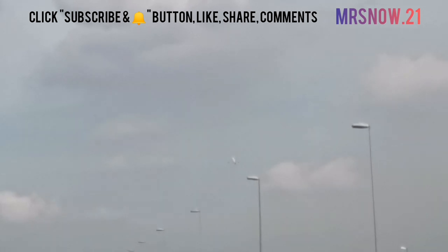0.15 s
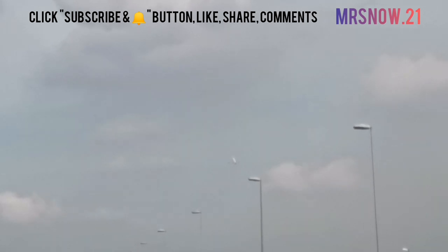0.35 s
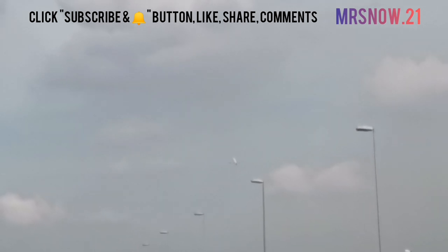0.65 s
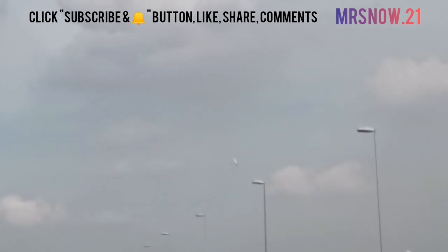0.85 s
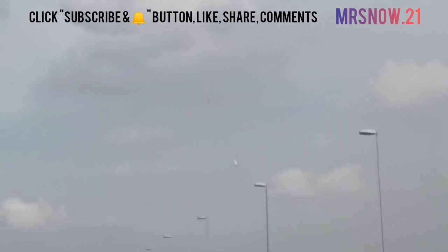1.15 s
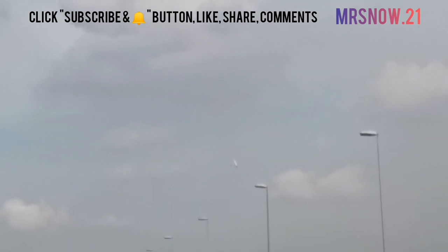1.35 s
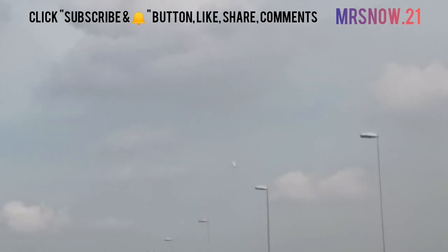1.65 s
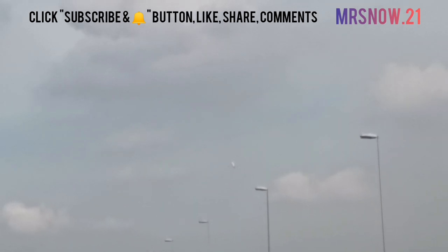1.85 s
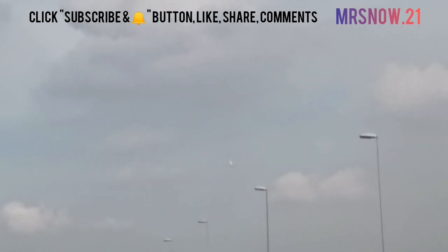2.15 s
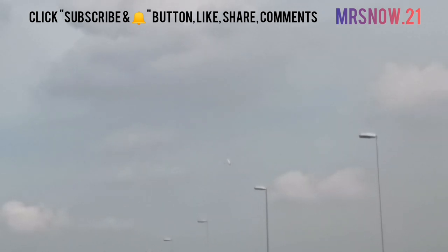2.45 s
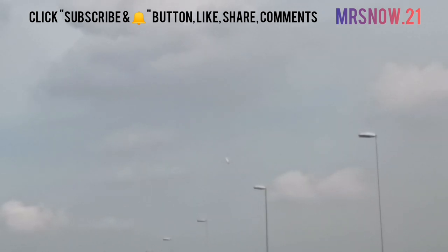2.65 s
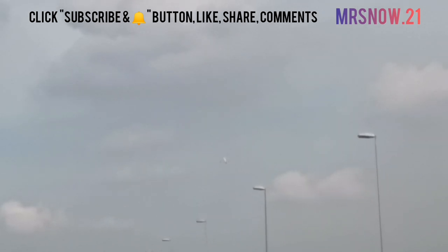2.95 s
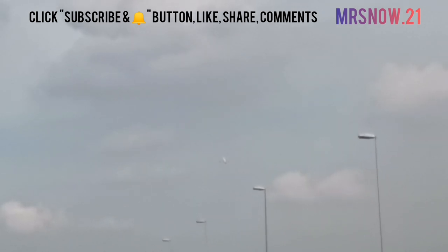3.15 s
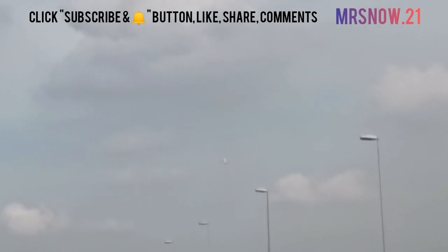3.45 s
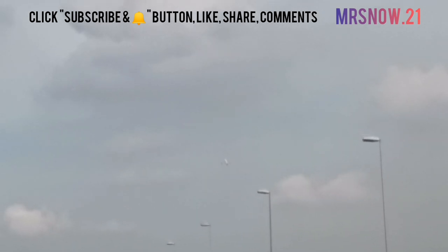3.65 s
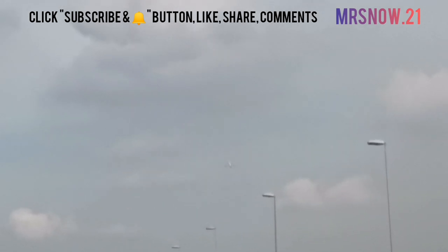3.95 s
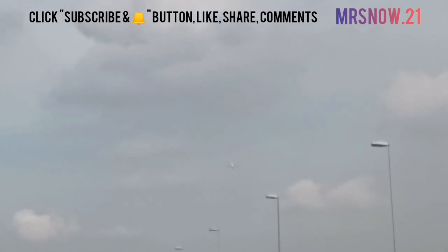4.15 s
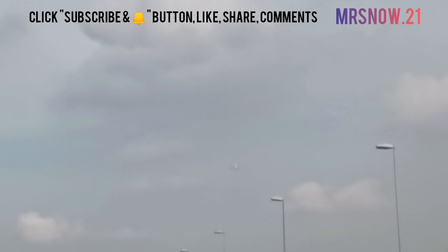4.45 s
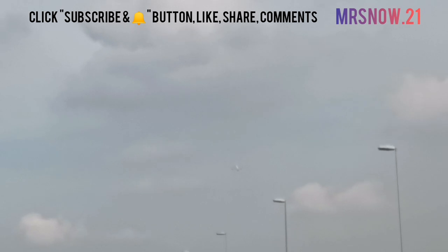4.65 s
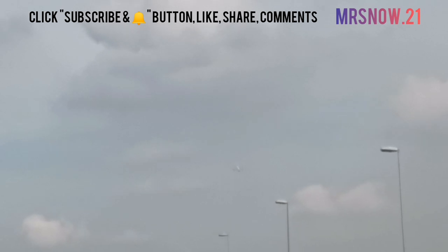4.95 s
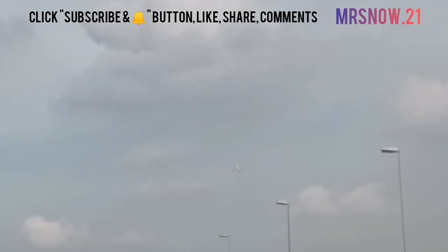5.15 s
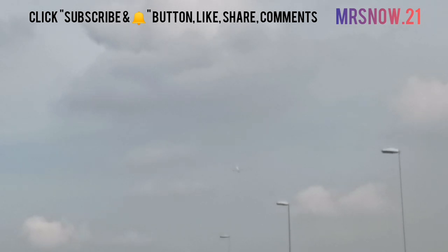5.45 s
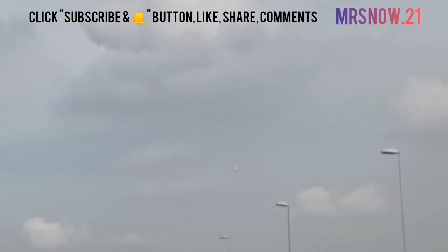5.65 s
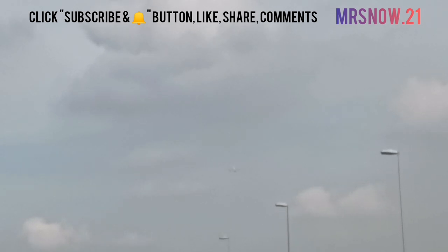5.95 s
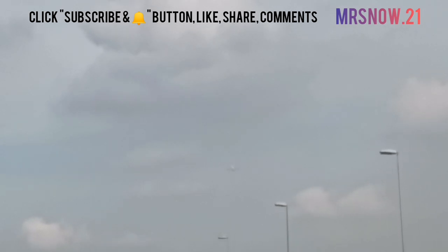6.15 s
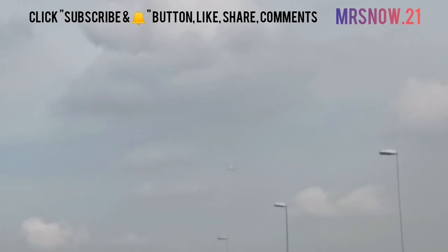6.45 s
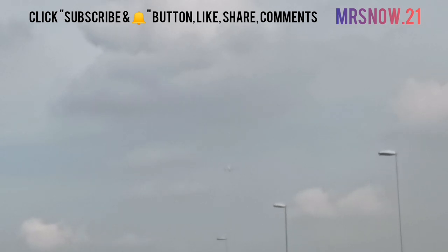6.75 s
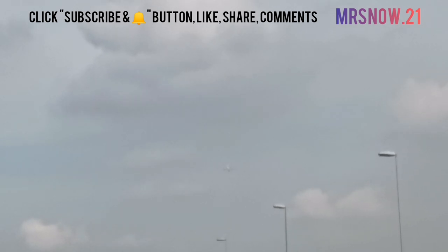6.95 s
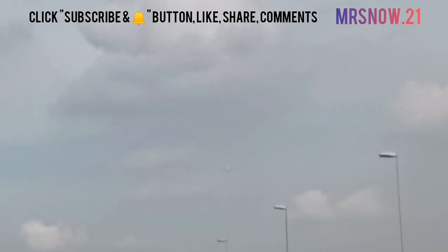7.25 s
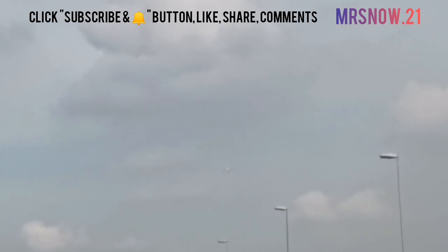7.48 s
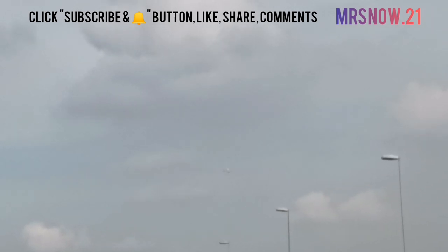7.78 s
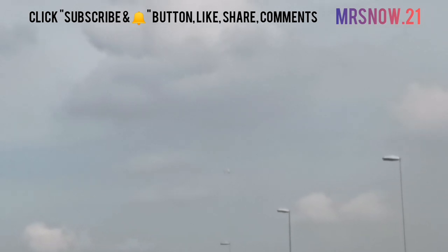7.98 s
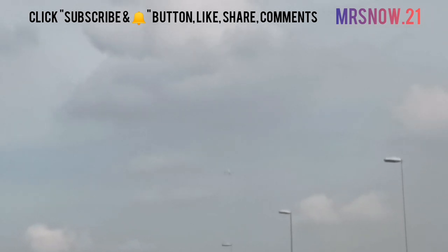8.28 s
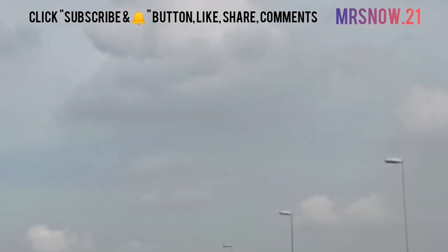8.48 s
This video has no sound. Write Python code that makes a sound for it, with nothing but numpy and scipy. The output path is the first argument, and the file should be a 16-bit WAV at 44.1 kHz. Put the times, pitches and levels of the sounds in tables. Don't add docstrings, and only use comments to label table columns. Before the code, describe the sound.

Outdoors near walls and leaves, a far airliner gives a deep, unsteady rumble that brightens around the middle, then fades. Two small birds repeat quick two-note whistles about twice a second, with short echoes. One pauses, a single dull tick lands on the right, then it resumes. Other birds chip and coo; town hum and high insect hiss stay beneath. Small stereo recorder.

```python
import sys
import numpy as np
from scipy import signal
from scipy.fft import rfft, irfft, next_fast_len
from scipy.io import wavfile
from scipy.ndimage import uniform_filter1d

SR = 44100
rng = np.random.default_rng(int(sys.argv[2]) if len(sys.argv) > 2 else 0)


def inscribe(sig):
    pcm = np.round(np.clip(np.atleast_2d(sig).T, -1, 1) * 32767)
    wavfile.write(sys.argv[1], SR, pcm.astype(np.int16))


def volts_from_db(level):
    exponent = np.asarray(level, float) / 20
    return 10 ** exponent


N = 380141


def at_hz(points, hz):
    f_hz, values = np.transpose(points)
    return np.interp(np.log(hz), np.log(f_hz), values)


def in_time(rows):
    s, *columns = np.transpose(rows)
    return [np.interp(np.arange(N) / SR, s, c) for c in columns]


# f/Hz, likeness
PORT_LIKENESS = [(60, 1), (200, 1), (380, .98), (700, 0.8), (1200, 0.41), (1900, 0.075), (2600, 0.17),
                 (8000, 0.046)]
# f/Hz, left minus right/dB
PORT_LEAN = [(60, -1), (210, -1.5), (400, -1), (900, -2), (2500, -4), (3700, -8), (4800, -6.5), (6000, -4),
             (7800, 7), (9100, 17.5), (11000, -13), (14000, -0.5)]
# f/Hz, lead/rad
PORT_LEAD = [(900, 0), (1300, 1.6), (2200, 3.8), (16000, 27)]


def stereo_noise(colour, weight=lambda hz: 1):
    size = next_fast_len(N)
    hz = np.maximum(np.arange(size // 2 + 1) * SR / size, 1)
    mid, side = rfft(rng.standard_normal((2, size)))
    alike = np.clip(at_hz(PORT_LIKENESS, hz), -1, 1)
    lead_rad = np.interp(hz, *np.transpose(PORT_LEAD))
    ports = volts_from_db(at_hz(PORT_LEAN, hz) * [[.5], [-.5]]) * np.exp(1j * lead_rad * [[1], [0]])
    pair = ports * (np.sqrt(1 + alike) * mid + np.sqrt(1 - alike) * side * [[1], [-1]])
    out = irfft(pair * volts_from_db(at_hz(colour, hz)) * weight(hz), size)[:, :N]
    return out / out.mean(axis=0).std()


# t/s, level/dB, swell of the middle and upper roar/dB
CLIMB_OUT = [(0, -37, -6.5), (.15, -33.5, -6.5), (.8, -35, -8), (1.4, -37, -2.5), (1.9, -32.5, -6),
             (2.3, -34.5, -0.5), (2.8, -35.5, 1.5), (3.4, -36, 5), (3.8, -34.5, 0.5), (4.3, -36, 4),
             (4.8, -35, 3), (5.2, -33.5, 1), (5.7, -34, 0), (6.2, -35.5, 0), (6.8, -38, -0.5),
             (7.6, -38.5, -2.5), (8.5, -42.5, -1.5), (8.62, -40.5, 0)]
# f/Hz, density/dB
ROAR_SPECTRUM = [(12, -30), (20, -9), (109, 6.5), (168, -1), (233, -2), (262, -5), (349, -15.5), (427, -17),
                 (620, -33.5), (810, -64), (1360, -120)]
ROAR_CENTRES_HZ = [40, 90, 135, 200, 270, 400]
# offset/dB, share of level swing, share of swell
ROAR_SHARES = [
    (-41.5, 0.9, -0.082),
    (-40, 1.23, -.05),
    (-38, 0.48, 0.4),
    (-39.5, 1.1, 1.03),
    (-42.5, 0.8, 1.28),
    (-50.5, 0.42, 0.42),
]


def jet():
    level_db, swell_db = in_time(CLIMB_OUT)
    level_swing_db = level_db - level_db.mean()
    swell_swing_db = swell_db - swell_db.mean()
    out = 0
    for k, (offset_db, by_level, by_swell) in enumerate(ROAR_SHARES):
        share = list(zip(ROAR_CENTRES_HZ, np.eye(len(ROAR_CENTRES_HZ))[k]))
        part_db = offset_db + by_level * level_swing_db + by_swell * swell_swing_db
        out = out + volts_from_db(part_db) * stereo_noise(ROAR_SPECTRUM, lambda hz: np.sqrt(at_hz(share, hz)))
    stop_fade_s = .02
    return out * np.minimum((N - np.arange(N)) / SR / stop_fade_s, 1)


def add_note(track, start_s, shape, level_db, wobble, flutter_db):
    s, hz, db = np.transpose(shape)
    t = np.arange(s[0], s[-1], 1 / SR)
    chance = np.random.default_rng(rng.integers(1 << 30)).standard_normal((2, len(t)))
    shake, flutter = uniform_filter1d(chance, size=225) * 15
    phase = 2 * np.pi * np.cumsum(np.interp(t, s, hz) * (1 + wobble * shake)) / SR
    envelope = volts_from_db(np.interp(t, s, db) + flutter_db * flutter + level_db)
    note = envelope * np.sin(phase) * signal.windows.tukey(len(t), .25)
    at = max(round((start_s + s[0]) * SR), 0)
    track[..., at:at + len(t)] += note[..., :track.shape[-1] - at]


def outdoors(track, paths, turn_db=0, wall=1):
    wall_echo_s, hold_s, t60_s, left_lead_s, onset_s = .036, .07, .26, .00029, .0034
    t, out = np.arange(SR // 2) / SR, []
    for side, (direct_db, echo_db, scatter_db) in enumerate(paths):
        source = np.atleast_2d(track)[-side]
        fade = np.minimum(t / onset_s, 1) * volts_from_db(-60 * np.maximum(t - hold_s, 0) / t60_s)
        clumps = volts_from_db(np.repeat(rng.normal(0, 3, len(t) // 150), 150))
        path = rng.standard_normal(len(t)) * fade * clumps
        path *= volts_from_db(scatter_db) / np.sqrt(np.sum(path ** 2))
        echo = volts_from_db(echo_db) * wall * np.ones(1)
        path[round(wall_echo_s * SR):][:len(echo)] += echo
        lag = round(side * left_lead_s * SR)
        direct = volts_from_db(direct_db) * np.pad(source, (lag, 0))[:N]
        out.append(direct + signal.fftconvolve(source * volts_from_db(turn_db), path)[:N])
    return np.array(out)


def song(cues_s, levels_db, shape, paths, turn_db, wall=1):
    track = np.zeros(N + SR)
    for s, level_db in zip(cues_s, levels_db):
        varied = np.multiply(shape, [1, 1 + .006 * rng.standard_normal(), 1])
        add_note(track, s, varied, level_db + 3, wobble=.004, flutter_db=3)
    return outdoors(track[:N], paths, turn_db, wall)


# t/s, first bird/dB, second bird/dB
HEAD_TURNS = [
    (0, 0, 0),
    (4, 0, 0),
    (4.5, 3, 0),
    (5, 3, 0),
    (5.8, -1, -4),
    (6.3, -1, -5),
    (6.8, -7, -4),
    (7.5, -5, -4),
    (8.6, 0, -4),
]


def head_turns():
    return in_time(HEAD_TURNS)


# fall t/s, whip level/dB, fall level/dB
WHIP_FALL_SONG = [(.272, -56.5, -63), (.731, -57, -60.5), (1.187, -55, -61.5), (1.645, -55.5, -60.5),
                  (2.104, -58, -60), (2.559, -54.5, -60.5), (3.028, -54.5, -58.5), (3.479, -56.5, -61.5),
                  (3.931, -57.5, -59.5), (4.389, -64, -62), (4.856, -61, -66.5), (5.328, -58, -63.5),
                  (5.81, -62, -61.5), (6.306, -58, -63), (6.781, -57.5, -63), (7.27, -54, -61),
                  (7.773, -60, -57)]
# t after cue/s, f/Hz, level/dB
WHIP_SHAPE = [(-.002, 3200, -18), (.003, 3950, -3), (.010, 4500, -1), (.021, 5300, -6), (.031, 5700, -12)]
# t after cue/s, f/Hz, level/dB
FALL_SHAPE = [(.006, 3630, -6), (.023, 3590, 2), (.045, 3050, 4), (.062, 2600, -1), (.078, 2220, -7)]
# direct/dB, wall echo/dB, scatter/dB
WHIP_TO_PORTS = [(-3, -5, 2.5), (-9, -1, 2.5)]
# direct/dB, wall echo/dB, scatter/dB
FALL_TO_PORTS = [(0, -8, .5), (-6, 3.5, 4)]


def first_bird(turn_db):
    whip_lead_s, ring_hz, ring_width_hz = .164, 3150, 650
    b, a = signal.iirpeak(ring_hz, ring_hz / ring_width_hz, fs=SR)
    recess = signal.lfilter(b, a, signal.unit_impulse(256))
    s, whip_db, fall_db = np.transpose(WHIP_FALL_SONG)
    whips = song(s - whip_lead_s, whip_db, WHIP_SHAPE, WHIP_TO_PORTS, turn_db)
    falls = song(s, fall_db, FALL_SHAPE, FALL_TO_PORTS, turn_db, recess)
    return whips + falls


# drop t/s, rise level/dB, drop level/dB
RISE_DROP_SONG = [(0.127, -71, -63), (.553, -59, -61), (0.988, -54.5, -58.5), (1.416, -62, -59.5),
                  (1.845, -75, -64.5), (2.277, -62, -61), (2.701, -60, -59), (3.134, -60, -57),
                  (3.569, -59, -59.5), (3.997, -60, -59), (4.439, -63.5, -64), (6.514, -61.5, -62.5),
                  (6.942, -60.5, -56.5), (7.366, -53, -60), (7.806, -55, -52.5), (8.251, -59, -62),
                  (8.683, -53, -60)]
# t after cue/s, f/Hz, level/dB
RISE_SHAPE = [(0, 3850, -7), (.012, 4100, -2), (.028, 4400, 0), (.042, 4480, -3)]
# t after cue/s, f/Hz, level/dB
DROP_SHAPE = [(-.008, 3250, -10), (.012, 3000, 0), (.035, 2550, -4), (.052, 2350, -12)]
# direct/dB, wall echo/dB, scatter/dB
RISE_TO_PORTS = [(-1, -20, 2), (-3, -20, 4)]
# direct/dB, wall echo/dB, scatter/dB
DROP_TO_PORTS = [(-3, -20, 0), (-4, -14, 5)]


def second_bird(turn_db):
    rise_lead_s = .147
    s, rise_db, drop_db = np.transpose(RISE_DROP_SONG)
    rises = song(s - rise_lead_s, rise_db, RISE_SHAPE, RISE_TO_PORTS, turn_db)
    drops = song(s, drop_db, DROP_SHAPE, DROP_TO_PORTS, turn_db)
    return rises + drops


# t/s, f/Hz, level/dB
RIGHT_CHIPS = [(0.851, 2500, -58), (1.915, 3330, -69), (2.399, 2700, -61), (2.89, 2670, -62.5),
               (5.6, 2770, -70), (6.08, 3800, -66), (7.185, 2600, -59.5), (7.391, 2580, -63),
               (8.282, 2594, -61.5), (1.03, 4150, -59), (1.72, 4500, -68)]
# t/s, length/s, start f/Hz, end f/Hz, level/dB
SLURS_RIGHT = [(.69, 0.037, 3130, 3310, -67), (0.889, 0.015, 2750, 3330, -54.5),
               (1.095, 0.1, 2714, 2540, -59.5), (1.203, 0.11, 2525, 2330, -64.5),
               (1.328, .06, 3350, 3250, -65), (1.519, 0.048, 3050, 2940, -60),
               (1.936, 0.024, 3360, 3470, -56), (1.958, 0.018, 3360, 2480, -51),
               (2.8, 0.044, 3300, 3370, -67), (7.452, 0.12, 2606, 2740, -69),
               (7.659, .048, 2780, 3110, -60), (7.684, 0.03, 2960, 1940, -57),
               (7.714, .045, 2156, 2410, -58.5), (7.75, 0.2, 2880, 2850, -68)]
# t/s, f/Hz, level/dB
AHEAD_COOS = [
    (3.13, 1880, -60),
    (4.65, 2030, -55),
    (5.87, 2050, -60),
    (7.78, 1930, -65),
    (7.82, 1950, -54),
    (7.99, 2070, -61.5),
]
# t/s, length/s, start f/Hz, end f/Hz, level/dB
SLURS_AHEAD = [
    (4.19, 0.055, 3100, 3110, -67),
    (5.689, 0.22, 2750, 2970, -71),
    (5.912, .085, 2710, 3350, -64),
    (6.02, .064, 4000, 3960, -62),
    (7.7, 0.086, 4130, 3630, -57),
    (7.91, .035, 1450, 1640, -69),
]
# direct/dB, wall echo/dB, scatter/dB
STRAYS_TO_PORTS = [(-1, -20, -7), (-2, -20, -7)]


def strays():
    chip_s, chip_sag, coo_s, coo_sag = .021, .03, .035, .031
    right_lean_db, ahead_lean_db = -15, -4
    chips = [(s, chip_s, hz, hz * (1 - chip_sag), db) for s, hz, db in RIGHT_CHIPS]
    coos = [(s, coo_s, hz, hz * (1 - coo_sag), db) for s, hz, db in AHEAD_COOS]
    right, ahead = [*chips, *SLURS_RIGHT], [*coos, *SLURS_AHEAD]
    track = np.zeros((2, N))
    for notes, lean_db in ((right, right_lean_db), (ahead, ahead_lean_db)):
        for s, length_s, start_hz, end_hz, level_db in notes:
            ports_db = level_db + lean_db * np.array([[.5], [-.5]])
            shape = [(0, start_hz, 0), (length_s, end_hz, 0)]
            add_note(track, s, shape, ports_db, wobble=.017, flutter_db=4)
    return outdoors(track, STRAYS_TO_PORTS)


# t/s, length/s, start f/Hz, end f/Hz, level/dB
LEAF_SLURS = [
    (0, .03, 3020, 2550, -60),
    (4.1, 0.068, 4540, 5640, -66),
    (6.198, 0.17, 1627, 1410, -65),
    (7.115, 0.018, 3200, 3900, -57),
    (7.145, 0.03, 3920, 3100, -56),
    (7.165, .025, 3330, 2900, -62),
    (7.724, 0.072, 4400, 3600, -53),
    (7.77, 0.023, 4740, 3440, -58),
]
# direct/dB, wall echo/dB, scatter/dB
HIDDEN_TO_PORTS = [(-12, -20, -1), (-8, -20, 3)]


def hidden():
    track = np.zeros(N)
    for s, length_s, start_hz, end_hz, level_db in LEAF_SLURS:
        shape = [(0, start_hz, 0), (length_s, end_hz, 0)]
        add_note(track, s, shape, level_db, wobble=.03, flutter_db=4)
    return outdoors(track, HIDDEN_TO_PORTS)


# t/s, peak level/dB, f/Hz
RIGHT_TICK = [
    (5.3406, -37, 1250),
]


def tick():
    out, t = np.zeros((2, N)), np.arange(-.004, .004, 1 / SR)
    for s, peak_db, hz in RIGHT_TICK:
        at = round((s - .0026) * SR)
        lead_in = .3 * np.exp(-((t + .0014) / .0009) ** 2) * np.cos(2 * np.pi * 2150 * t)
        swing = np.exp(-(t / .0006) ** 2) * np.cos(2 * np.pi * hz * t - .5)
        out[1, at:at + len(t)] = -volts_from_db(peak_db + 6.5) * (lead_in + swing)
    return out


def drift(rate_hz):
    r = np.exp(-80 * np.pi * rate_hz / SR)
    chance = rng.standard_normal(N // 40 + 2002)
    slow = signal.lfilter([1], [1, -2 * r, r * r], chance)[2000:]
    return np.interp(np.arange(N) / 40, np.arange(len(slow)), slow / slow.std())


# f/Hz, density/dB
HUM_SPECTRUM = [(330, -17), (560, -9.5), (638, -6.5), (893, -2), (1220, -13.5), (2120, -20.5), (2300, -18),
                (2990, -49), (5060, -120)]
# f/Hz, density/dB
LOW_INSECTS = [(1290, -22), (2200, -17.5), (2390, -8), (3000, -7), (3750, -8), (4750, 1), (5600, -0.5),
               (6260, -6.5), (7000, -7.5), (9100, -42), (15400, -120)]
# f/Hz, density/dB
HIGH_INSECTS = [(4100, -42), (7000, -9.5), (7400, -12.5), (7830, -5), (8300, -14), (8800, -6.5),
                (9150, -2.5), (9560, -5), (10200, -17), (11000, -18.5), (12000, -30), (14300, -28),
                (14600, -41), (15600, -39)]


def air():
    split_hz, hiss_from_hz = 3750, 10200
    traffic_thins_s, lull_s, lull_width_s = 7.1, 4.37, 3.6
    t = np.arange(N) / SR
    hum_db = -59.5 - 0.5 * t - 1.6 * np.maximum(t - traffic_thins_s, 0)
    insects_db = -67 - 3 * np.exp(-((t - lull_s) / lull_width_s) ** 2)
    hum = volts_from_db(hum_db + 0.72 * drift(5.7)) * stereo_noise(HUM_SPECTRUM)
    low = volts_from_db(insects_db - 4.0 + 2.2 * drift(3.0)) * stereo_noise(LOW_INSECTS, lambda hz: hz < split_hz)
    middle = volts_from_db(insects_db + 1.5 + 0.85 * drift(7.3)) * stereo_noise(LOW_INSECTS, lambda hz: hz >= split_hz)
    high = volts_from_db(-71 + 0.47 * drift(45)) * stereo_noise(HIGH_INSECTS, lambda hz: hz < hiss_from_hz)
    hiss = volts_from_db(-83.0) * stereo_noise(HIGH_INSECTS, lambda hz: hz >= hiss_from_hz)
    return hum + low + middle + high + hiss


def scene():
    first_turn_db, second_turn_db = head_turns()
    singers = first_bird(first_turn_db) + second_bird(second_turn_db)
    return jet() + singers + strays() + hidden() + tick() + air()


def top_cut(x):
    return signal.sosfilt(signal.butter(12, 15600, fs=SR, output="sos"), x)


def record(dry):
    return top_cut(dry)


dry = scene()
out = record(dry)
inscribe(out)
```